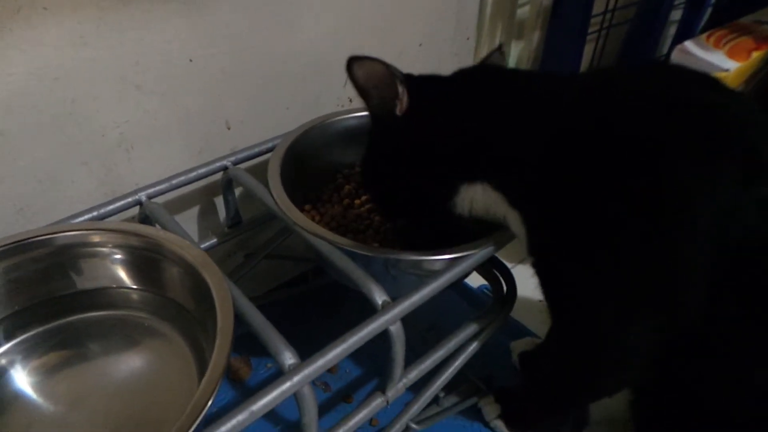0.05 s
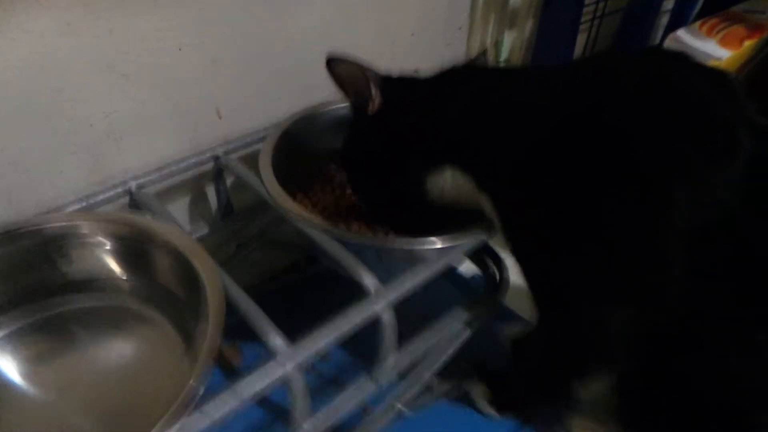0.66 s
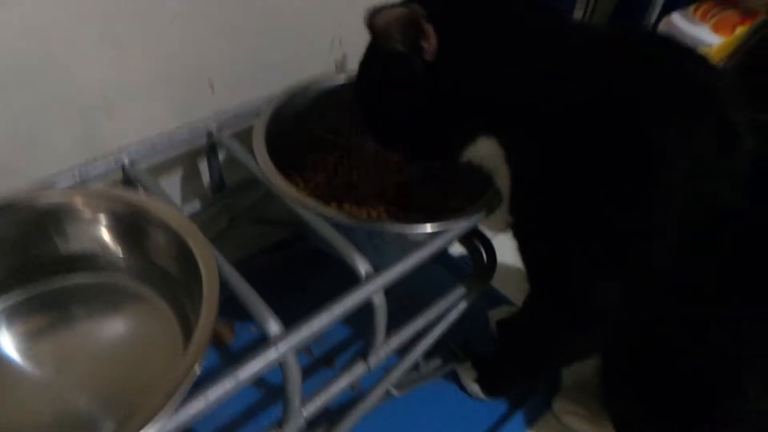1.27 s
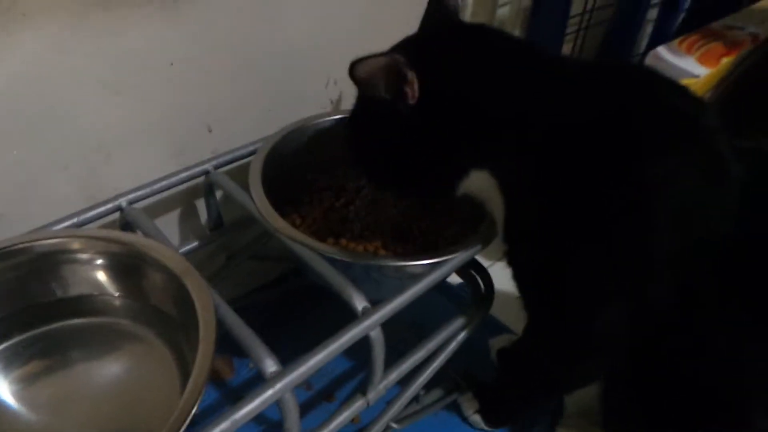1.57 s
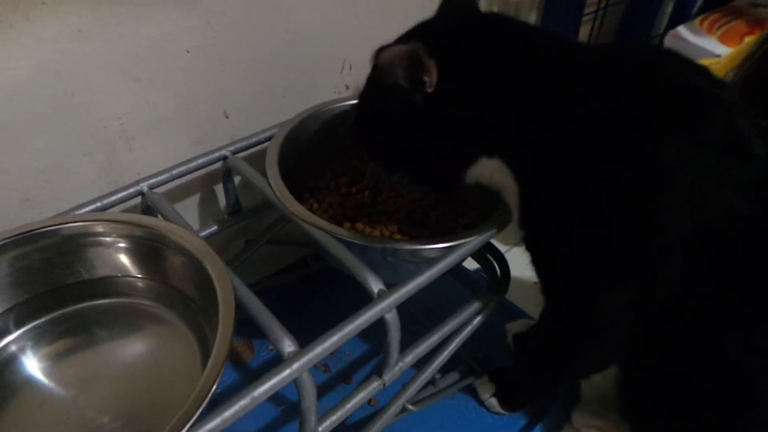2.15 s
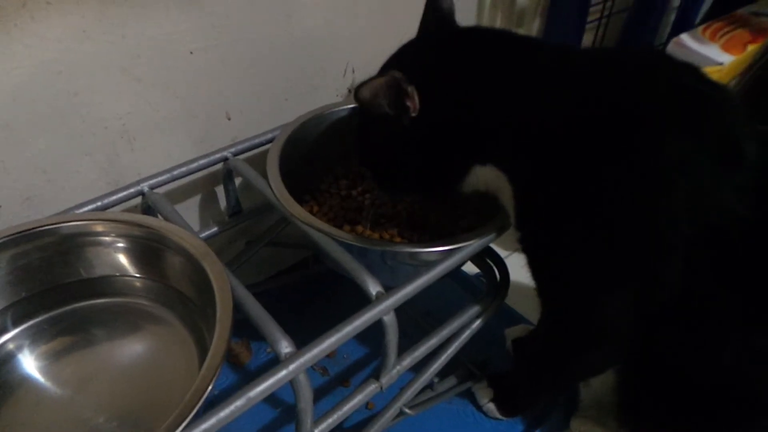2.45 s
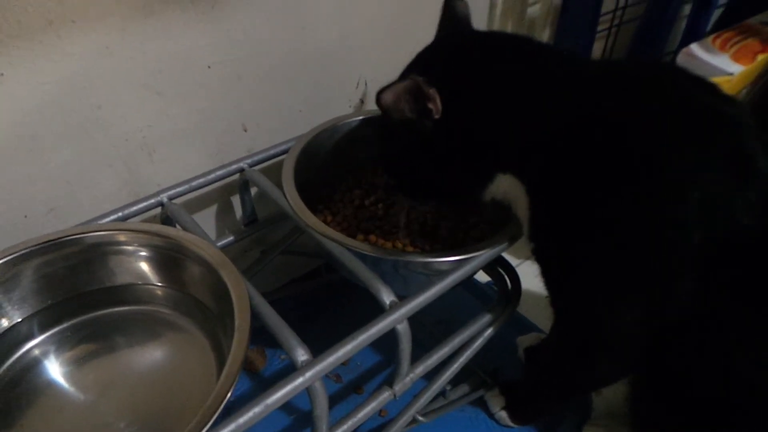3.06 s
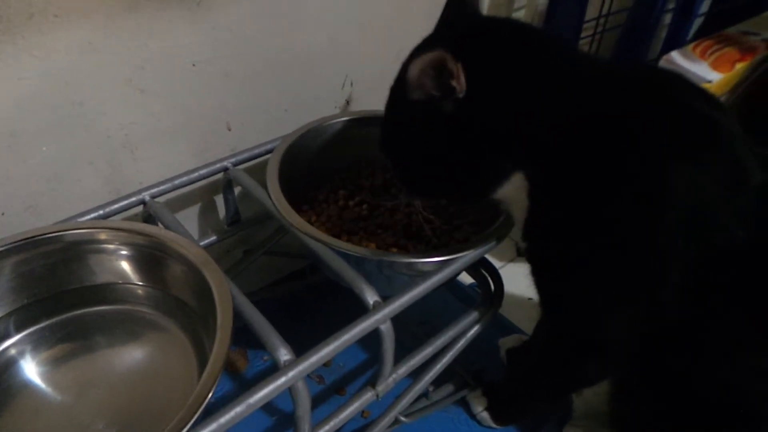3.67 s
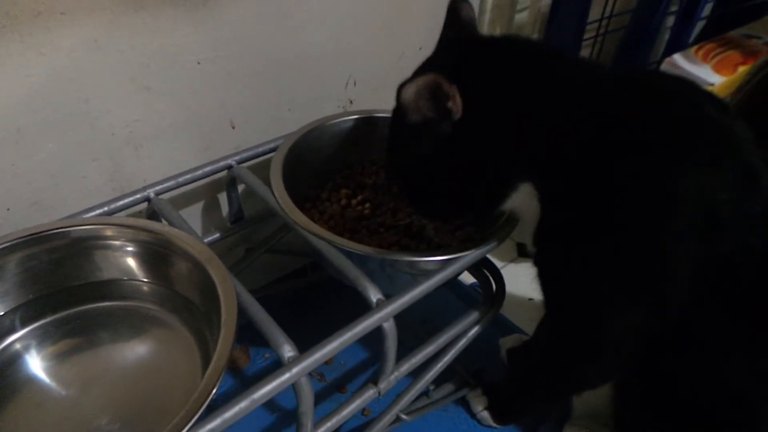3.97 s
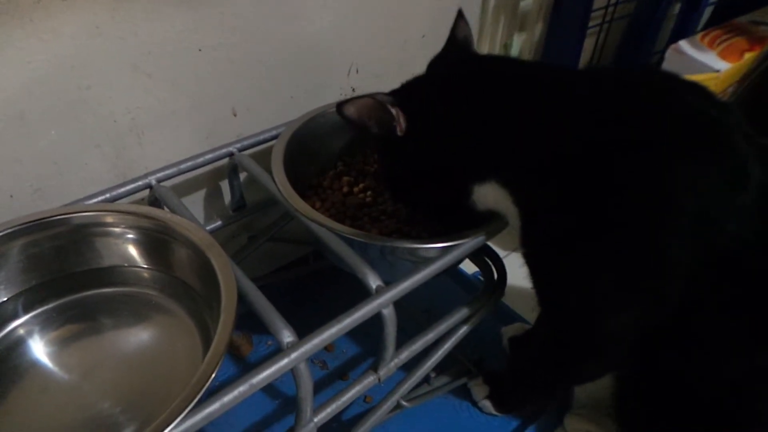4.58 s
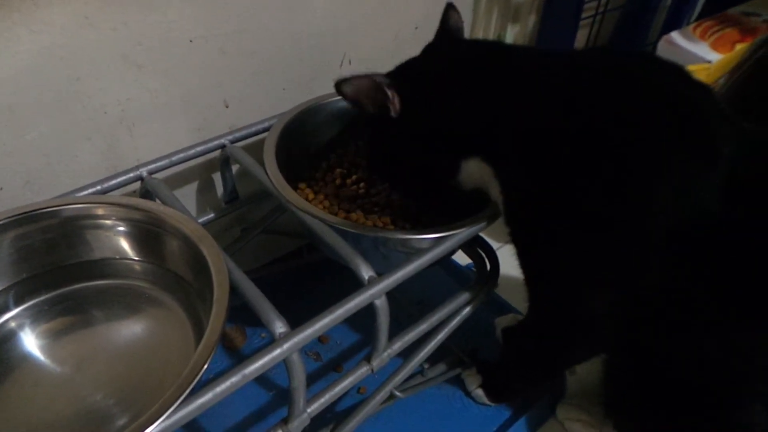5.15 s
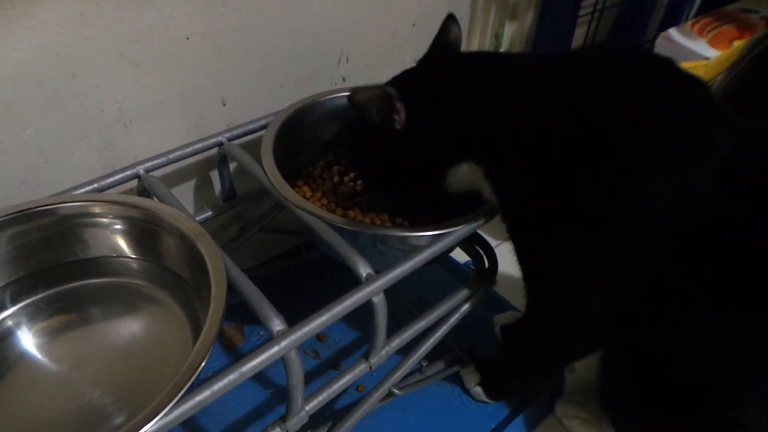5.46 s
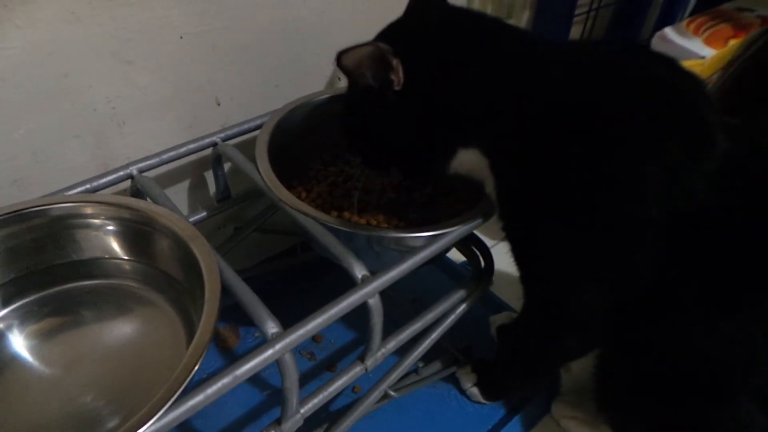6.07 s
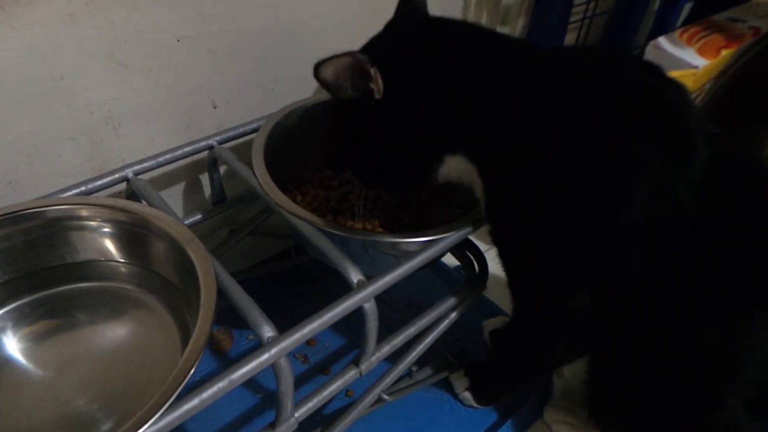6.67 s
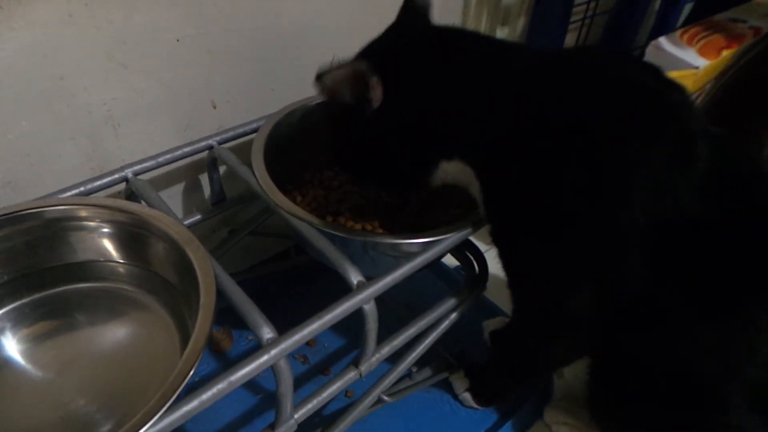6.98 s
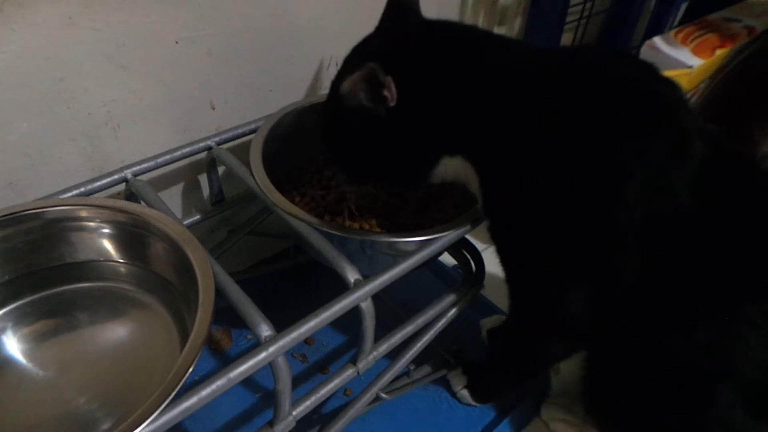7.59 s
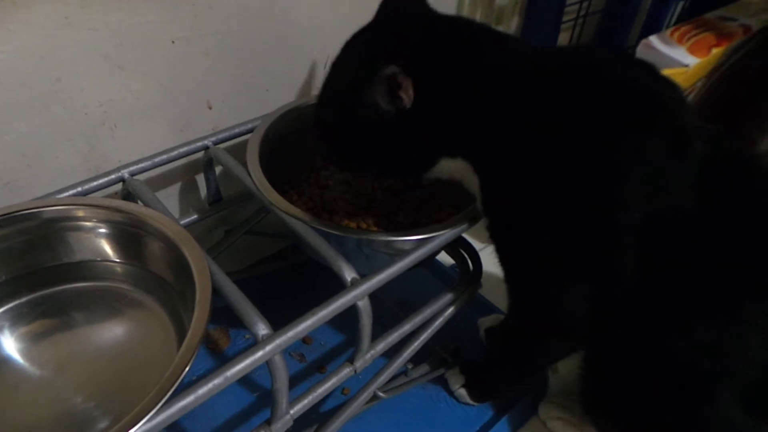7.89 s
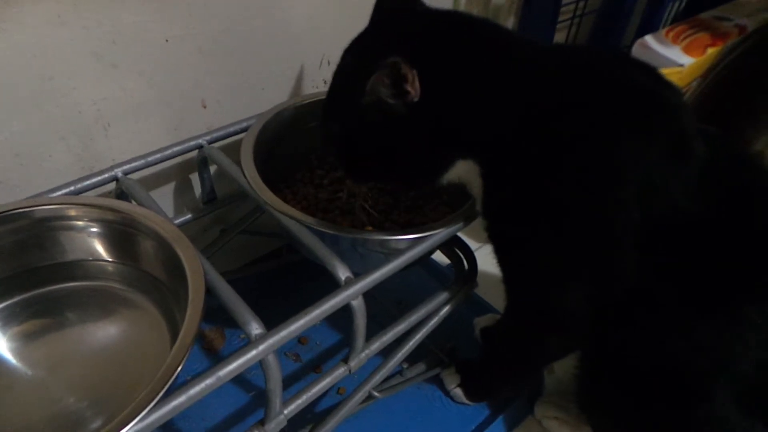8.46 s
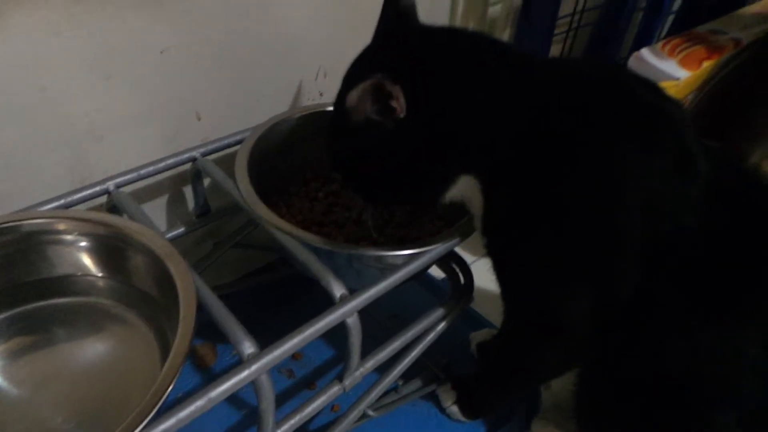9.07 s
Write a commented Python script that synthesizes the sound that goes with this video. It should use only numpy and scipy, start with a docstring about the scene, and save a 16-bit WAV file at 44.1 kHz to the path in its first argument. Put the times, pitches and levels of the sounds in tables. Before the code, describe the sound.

Heard from close by in a quiet room, dry pellets crack and crunch as a cat feeds from a metal bowl, with a brief brushing hiss and tiny jingles of metal. The eating settles into soft chews and wet smacks before another cluster of sharp snaps and jingling. Scattered tooth cracks and fainter jingles finish it, while an appliance hums low and faint throughout.

```python
"""A cat at a steel bowl of dry kibble in a quiet room, one small microphone close by, in mono.
Over the faint hum of an appliance, the first pellets snap and crumble; something brushes along the bowl
and a bit of metal, perhaps a collar bell, jingles. From about 2.5 s there is mostly soft, wet chewing.
A second burst of snaps, crunches and jingles comes at 5.3 s. After 6 s the metal jingles more faintly
and single pellets crack between the teeth."""
import sys
import numpy as np
from scipy import signal
from scipy.fft import rfft, irfft
from scipy.io import wavfile

SR = 44100
rng = np.random.default_rng(int(sys.argv[2]) if len(sys.argv) > 2 else 0)


def inscribe(sig):
    """Save sig as 16-bit PCM at rate SR to the path in sys.argv[1].

    A 1-D sig is mono; a 2-D sig holds one channel per row.
    Samples are clipped to [-1, 1] before scaling.
    """
    pcm = np.round(np.clip(np.atleast_2d(sig).T, -1, 1) * 32767)
    wavfile.write(sys.argv[1], SR, pcm.astype(np.int16))


N = 411453
TIME = np.arange(N) / SR
EVENT_TIME = TIME[:SR // 4]
BASS_EDGE_HZ, TREBLE_EDGE_HZ = 1500, 5000  # the mid band lies between

# Levels in the tables are relative. Spectrum of the room tone: f/Hz, level/dB
AIR_SPECTRUM = [(20, -12.5), (70, 1.5), (170, -10), (800, -16.5), (1100, -21.5), (3000, -26.5), (7000, -34),
                (14500, -34.5)]
# appliance tones: f/Hz, level/dB, unsteadiness
HUM_TONES = [(62.3, -72.5, 0.78), (76, -72, 0.51), (118.3, -73, 0.54), (441, -79, 0.56)]
# strokes along the bowl: t/s, length/s, level/dB
BRUSH_STROKES = [(0.293, 0.1, -58), (0.506, 0.035, -51.5), (0.637, 0.34, -56.5), (0.94, 0.072, -59),
                 (1.112, 0.025, -48)]
# their hiss: f/Hz, level/dB
BRUSH_SPECTRUM = [(300, 3), (3300, 3.5), (4200, 9), (5200, -1), (7400, -1), (8800, 7), (10200, -0.5),
                  (12500, -0.5), (14500, -16)]
# how hard the muzzle works in the food: t/s, level/dB
MUZZLE_EFFORT = [(0.0, -57), (0.65, -52.5), (1.25, -66), (2.65, -62.5), (4.5, -72.5), (5.7, -51.5),
                 (6.3, -65.5), (9.33, -66.5)]
# rustle of the heap: f/Hz, level/dB
RUSTLE_SPECTRUM = [(30, -4), (70, 15), (200, 1.5), (780, -4), (1000, -11), (3000, -14), (8000, -19),
                   (14000, -25)]
# mouth smacks that stand out: t/s, f/Hz, level/dB
LOUD_SMACKS = [(0.191, 2560, -52), (0.228, 2700, -57), (2.203, 2550, -62.5), (3.381, 1680, -60.5),
               (3.805, 1010, -66), (5.142, 2090, -62.5), (8.167, 2250, -62.5), (8.477, 1480, -60.5),
               (9.04, 1540, -66)]
# soft chews: t/s, length/s, level/dB
SOFT_CHEWS = [(1.553, 0.13, -60.5), (2.573, 0.13, -63), (3.045, 0.05, -64), (3.387, 0.36, -70.5),
              (3.784, 0.12, -67.5), (4.809, 0.11, -63.5), (4.889, 0.075, -65.5), (5.269, 0.032, -57),
              (6.441, 0.23, -65), (6.946, 0.19, -65.5), (8.082, 0.28, -70.5)]
# shakes of the metal: t/s, length/s, level/dB
SHAKES = [(0.51, 0.022, -47.5), (0.562, 0.028, -52), (0.763, 0.012, -40), (0.796, 0.013, -45.5),
          (5.3093, 0.02, -50), (5.365, 0.054, -48.5), (5.545, 0.016, -55.5), (5.821, 0.02, -54.5),
          (5.916, 0.028, -55), (6.441, 0.017, -62.5), (6.535, 0.011, -57.5), (6.992, 0.019, -60.5),
          (7.041, 0.0085, -61), (7.291, 0.031, -65.5), (7.504, 0.018, -57), (7.595, 0.013, -60.5),
          (7.892, 0.012, -57.5), (7.987, 0.019, -55), (8.081, 0.011, -65)]
# its modes, in three groups: f/Hz, level/dB, t60/s
METAL_LOWER = [(4805, -10, .05), (5034, 0, .08), (5075, -4, .07), (5303, -8, .05)]
METAL_UPPER = [(6500, -7, .08), (6599, 0, .12), (6652, -6, .09), (6870, -11, .05)]
METAL_TOP = [(7824, 0, .13)]
# lower group against upper, changing with how the metal lies: t/s, level/dB
METAL_BALANCE = [(0.55, -7), (0.78, -16), (5.3, -1.5), (8.1, 0)]
# rasp on the metal: f/Hz, level/dB
RASP_SPECTRUM = [(200, 0.5), (2000, -0.5), (3200, 4), (4300, -12.5), (7000, -1.5), (11000, -4.5),
                 (14500, -19)]
# the steel bowl, damped by its load: f/Hz, level/dB, t60/s
BOWL_MODES = [(370, 8, 0.061), (451.6, -14, 0.68), (602, 5, 0.043), (850, 4, 0.088), (1305, 7, 0.14)]
# resonances of kibble in the bowl: f/Hz, width/Hz, level/dB
KIBBLE_RESONANCES = [(640, 400, 7.5), (800, 192, 14), (1170, 1000, 1), (2390, 580, 9.5), (3690, 304, 5.5),
                     (4290, 260, 0), (5440, 750, -6.5), (6610, 400, -6), (8070, 3700, -15.5)]
# pellets cracking between the teeth: t/s, f/Hz, level/dB
BITES = [(0.1344, 2450, -51.5), (1.365, 5750, -57), (1.562, 3020, -60), (2.612, 6600, -49.5),
         (4.8112, 2480, -60), (4.899, 2530, -54), (4.947, 2200, -53), (6.954, 4530, -55),
         (7.378, 4560, -53.5), (7.7835, 4600, -47.5), (8.2357, 4460, -56.5), (8.68, 4370, -54)]
# pellets crumbling: t/s, length/s, mid-band level/dB, weight/dB (above 0 shifting heap, below 0 crumbs)
PELLET_CRUNCHES = [(0.332, 0.0032, -50, 0), (0.654, 0.036, -43.5, 1.5), (0.679, 0.041, -41.5, -2.5),
                   (0.798, 0.0104, -42, -3.5), (0.815, 0.053, -64, -4.5), (1.378, 0.0088, -55.5, -22),
                   (1.726, 0.019, -51.5, -6.5), (2.384, 0.027, -54, -14), (5.41, 0.067, -53.5, -5.5),
                   (5.521, 0.012, -49, -3), (5.671, 0.012, -41, -1.5), (5.683, 0.017, -33.5, -2.5),
                   (5.758, 0.013, -46, -2), (7.785, 0.012, -56.5, -4), (8.673, 0.021, -58.5, -6)]
# their micro-fractures: f/Hz, level/dB
CRUMB_SPECTRUM = [(60, -12.5), (230, -9), (370, -1), (560, 1.5), (1300, -8), (3000, -6), (7000, -15),
                  (10000, -17.5), (14500, -36)]
# pellets snapping or knocking: t/s, mid-band level/dB, knock/dB re mid band, treble/dB re mid band
PELLET_SNAPS = [(0.0546, -45, -7, -9.5), (0.317, -43.5, -9, -6), (0.4453, -34, -3.5, -7),
                (0.6834, -35.5, -2.5, -8), (0.7088, -37, 1, -4), (0.7345, -32.5, -7.5, -1.5),
                (0.7961, -36.5, 3, -14), (0.8092, -38, -15, 3.5), (0.871, -44.5, -9, -18),
                (1.107, -33.5, -3.5, -6), (1.197, -39, -7.5, -3), (1.2312, -41.5, 2.5, -9),
                (1.638, -53.5, 5.5, 10.5), (1.685, -44, -11.0, -3), (1.7075, -40.5, -5, -4.5),
                (1.7321, -38, -6, 2.5), (2.363, -36.5, -3, -6), (2.376, -25, -4.5, -6.5),
                (5.361, -43, -0.5, -18), (5.46, -42.5, -6, -9), (5.6805, -34.5, -7, -2),
                (5.6935, -28, -2.5, -2.5), (5.7055, -29, -2, -1), (5.711, -45, 3, 1), (5.7426, -43, -6, -1),
                (5.7705, -45, -2, -17), (5.777, -35.5, -8, -15), (5.8033, -46, 4, -7), (5.98, -39.5, -9, 0),
                (6.1118, -49.5, -2, -11)]


def from_db(db):
    """Decibels to gain."""
    return 10 ** (np.asarray(db) / 20)


def rms(x):
    """Root mean square."""
    return np.sqrt(np.mean(x ** 2) + 1e-20)


def add(track, start, sound):
    """Mix a sound into a track, starting at a time in seconds."""
    i = int(start * SR)
    track[i:i + len(sound)] += sound[:N - i]


def drift(per_s):
    """Slow random wander, with a spread of about 1."""
    knots = rng.standard_normal(4096)
    return np.interp(TIME * per_s, np.arange(len(knots)), knots)


def cut(x, hz, kind, order=2):
    """Butterworth filter."""
    return signal.sosfilt(signal.butter(order, hz, kind, fs=SR, output="sos"), x)


def colour(x, spectrum):
    """Give a sound a smooth spectrum; rms 1."""
    hz, db = np.transpose(spectrum)
    log_hz = np.log(np.fft.rfftfreq(len(x), 1 / SR) + 1)
    shaped = irfft(rfft(x) * from_db(np.interp(log_hz, np.log(hz), db)), len(x))
    return shaped / rms(shaped)


def resonate(x, hz, width_hz):
    """One resonance, with gain 1 at its peak."""
    radius = np.exp(-np.pi * width_hz / SR)
    feedback = [1, -2 * radius * np.cos(2 * np.pi * hz / SR), radius ** 2]
    return signal.lfilter(np.array([1, 0, -1]) * (1 - radius ** 2) / 2, feedback, x + 1e-18)


def ring(force, modes):
    """A force excites free modes, each a decaying sine."""
    hz, db, t60 = np.transpose(modes)[:, :, None]
    sines = from_db(db - 60 * EVENT_TIME / t60) * np.sin(2 * np.pi * hz * EVENT_TIME)
    return signal.fftconvolve(force, sines.sum(axis=0))[:len(force)]


def grains(per_s, spread_db, size=len(EVENT_TIME)):
    """Random tiny impacts of uneven strength."""
    strength = from_db(spread_db * np.minimum(rng.exponential(1, size), 4))
    return strength * rng.choice([-1, 1], size) * (rng.random(size) < per_s / SR)


def stroke(length, rise_s, fall_s, age=EVENT_TIME):
    """An effort that builds, holds for a length and dies away."""
    return (1 - np.exp(-age / rise_s)) * np.exp(-np.maximum(age - length, 0) / fall_s)


def balance_bands(x, length, mid_db, bass_db, treble_db):
    """Set an event's mid-band level over its opening length, and its bass and treble against that."""
    bass = cut(x, BASS_EDGE_HZ, "low", order=3)
    mid = cut(x, [BASS_EDGE_HZ, TREBLE_EDGE_HZ], "band", order=3)
    treble = cut(x, TREBLE_EDGE_HZ, "high", order=3)
    gains = from_db(mid_db + np.array([bass_db, 0, treble_db]))
    return sum(gain * band / rms(band[:int(length * SR)]) for gain, band in zip(gains, (bass, mid, treble)))


def room_tone(air_db=-63, waver_per_s=9):
    """Still air and the wavering hum of an appliance lie under everything."""
    bed = from_db(air_db) * colour(rng.standard_normal(N), AIR_SPECTRUM)
    for hz, db, unsteadiness in HUM_TONES:
        waver = 1 + unsteadiness * (drift(waver_per_s) + 1j * drift(waver_per_s))  # in level and phase
        tone = np.real(waver * np.exp(2j * np.pi * hz * TIME))
        bed += from_db(db) * tone / rms(tone)
    return bed


def room_reflections(x, t60=0.18, wet_db=-14, wall_hz=6000, gap_s=0.005):
    """The near wall and a small furnished room add a short, dull tail."""
    tail = cut(rng.standard_normal(len(EVENT_TIME)), wall_hz, "low", order=1)
    tail *= from_db(-60 * EVENT_TIME / t60) * (EVENT_TIME > gap_s)
    return x + from_db(wet_db) * signal.fftconvolve(x, tail / np.linalg.norm(tail))[:N]


def bowl_reflection(x, notches_hz=(940, 1780), width_hz=150, depth=0.62):
    """The reflection inside the bowl partly cancels two narrow bands, so knocks sound hollow."""
    for hz in notches_hz:
        x = x - depth * resonate(x, hz, width_hz)
    return x


def brushing(rise_s=0.0083, fall_s=0.066, gain_db=-1):
    """Fine friction along the bowl hisses through two broad resonances, stroke by stroke."""
    pressure = sum(from_db(db) * stroke(length, rise_s, fall_s, age=np.maximum(TIME - start, 0))
                   for start, length, db in BRUSH_STROKES)
    return from_db(gain_db) * pressure * colour(grains(per_s=15000, spread_db=2.9, size=N), BRUSH_SPECTRUM)


def smack(hz, length=0.026, width_hz=480, edge_s=0.009, spittle_db=-5):
    """A brief wet squelch: one resonance of the mouth inside a broad fizz of saliva."""
    age = EVENT_TIME[:SR // 10]
    fizz = resonate(rng.standard_normal(len(age)), hz, width_hz=hz)
    cavity = resonate(resonate(fizz, hz, width_hz), hz, 2 * width_hz)
    squelch = cavity / rms(cavity) + from_db(spittle_db) * fizz / rms(fizz)
    return squelch / rms(squelch) * stroke(length, edge_s, edge_s, age)


def muzzle(uneven_db=2.5, rustle_db=-3, smacks_per_s=45, soft_smacks_db=-73):
    """The heap gives under the muzzle with a dull rustle; the mouth smacks at changing pitches."""
    rustle = colour(grains(per_s=2500, spread_db=2.6, size=N), RUSTLE_SPECTRUM)
    effort_db = np.interp(TIME, *np.transpose(MUZZLE_EFFORT)) + uneven_db * drift(per_s=14)
    soft, loud = np.zeros(N), np.zeros(N)
    for when, pitch, force in rng.random((int(smacks_per_s * N / SR), 3)):
        gain = from_db(7 * (force - pitch))  # higher smacks are fainter
        add(soft, when * N / SR, gain * smack(hz=750 * 7 ** pitch))
    for start, hz, db in LOUD_SMACKS:
        add(loud, start, from_db(db) * smack(hz))
    return from_db(effort_db + rustle_db) * rustle + from_db(soft_smacks_db) * soft / rms(soft) + loud


def soft_chews(edge_s=0.004, change_db=3, pitch_spread=0.19):
    """Damp pellets rub softly; the mouth shifts their resonances anew on every chew."""
    out = np.zeros(N)
    for start, length, db in SOFT_CHEWS:
        friction = grains(per_s=2500, spread_db=2)
        body = 0
        for hz, width_hz, peak_db in KIBBLE_RESONANCES:
            gain = from_db(peak_db + change_db * rng.normal())
            shifted_hz = hz * np.exp(pitch_spread * rng.normal())
            body += gain * resonate(friction, shifted_hz, width_hz)
        add(out, start, from_db(db) * body / rms(body) * stroke(length, edge_s, edge_s))
    return out


def jingles(rise_s=0.002, metal_db=-0.5, top_db=-10.5, rasp_db=1.6, mode_spread_db=0.5):
    """As the head bobs, a hard grain skitters over thin metal, rasping and setting close modes beating."""
    out = np.zeros(N)
    for start, length, db in SHAKES:
        lower_db = np.interp(start, *np.transpose(METAL_BALANCE))
        touches = grains(per_s=2800, spread_db=0.36)
        force = touches * stroke(length, rise_s, fall_s=0.0048)
        metal = 0
        for modes, group_db in (METAL_UPPER, 0), (METAL_LOWER, lower_db), (METAL_TOP, top_db):
            varied = [(hz, mode_db + rng.normal(0, mode_spread_db), t60) for hz, mode_db, t60 in modes]
            tone = ring(force, varied)
            metal += from_db(group_db) * tone / rms(tone[:int(2 * length * SR)])
        rasp = colour(touches, RASP_SPECTRUM) * stroke(length / 2, rise_s / 2, fall_s=0.024)
        add(out, start, from_db(db) * (from_db(metal_db) * metal + from_db(rasp_db) * rasp))
    return out


def tooth_cracks(fracture_s=0.002, crumb=0.11, crumb_s=0.02, ring_q=8, fracture_db=-3):
    """A pellet cracks between the teeth: quick fractures, one short ring, then a trickle of crumbs."""
    out = np.zeros(N)
    breaking = np.exp(-EVENT_TIME / fracture_s) + crumb * np.exp(-EVENT_TIME / crumb_s)
    for start, hz, db in BITES:
        fractures = cut(grains(per_s=9000, spread_db=1.8) * breaking, [hz / 5, hz * 1.7], "band")
        ringing = resonate(fractures, hz, hz / ring_q)
        for part, part_db in (fractures, db + fracture_db), (ringing, db):
            add(out, start, from_db(part_db) * part / rms(part[:SR // 200]))  # level of the first 5 ms
    return out


def crunches(bass_db=1.5, treble_db=-7.5, dulling=0.31, bowl_db=-54):
    """A pellet gives way in a dense run of micro-fractures that shake the bowl; heavier is duller."""
    out = np.zeros(N)
    for start, length, db, weight_db in PELLET_CRUNCHES:
        fractures = colour(grains(per_s=1700, spread_db=3.5), CRUMB_SPECTRUM)
        fractures *= stroke(length, rise_s=0.002, fall_s=0.014)
        crunch = fractures + from_db(bowl_db) * ring(fractures, BOWL_MODES)
        crunch = balance_bands(crunch, length, db, bass_db + weight_db, treble_db - dulling * weight_db)
        add(out, start, crunch)
    return out


def kibble(force):
    """The hard, quickly dying resonances of pellets in the bowl, in alternating polarity."""
    return sum((-1) ** k * from_db(db) * resonate(force, hz, width_hz)
               for k, (hz, width_hz, db) in enumerate(KIBBLE_RESONANCES))


def snaps(splinter=0.086, splinter_s=0.0011, crumb=0.011, crumb_s=0.014, sheen_db=-20, bowl_db=-60):
    """Close to the microphone: one brittle break, then a spray of bright splinters and a few crumbs."""
    out = np.zeros(N)
    splinter_age = EVENT_TIME / splinter_s
    spray = splinter * splinter_age * np.exp(1 - splinter_age) + crumb * np.exp(-EVENT_TIME / crumb_s)
    contact = cut(signal.unit_impulse(len(EVENT_TIME)), 4000, "low", order=1)
    for start, db, knock_db, treble_db in PELLET_SNAPS:
        force = contact + cut(rng.standard_normal(len(spray)) * spray, 2500, "high")
        sheen = from_db(sheen_db + treble_db) * cut(force, 2 * TREBLE_EDGE_HZ, "high")
        snap = kibble(force) + sheen + from_db(bowl_db) * ring(force, BOWL_MODES)
        add(out, start, balance_bands(snap, 0.005, db, knock_db, treble_db))
    return out


def scene():
    """The meal from close by, with the room behind it, the same in both channels."""
    in_bowl = bowl_reflection(snaps() + crunches())
    meal = in_bowl + tooth_cracks() + jingles() + muzzle() + soft_chews() + brushing()
    mono = room_reflections(meal) + room_tone()
    return np.stack([mono, mono])


def record(dry, low_hz=42, top_hz=14750):
    """The small microphone loses the deepest bass; the top is cut steeply."""
    thinned = cut(dry, low_hz, "high")
    return signal.sosfilt(signal.ellip(10, 0.1, 80, top_hz, fs=SR, output="sos"), thinned)


dry = scene()
out = record(dry)
inscribe(out)
```